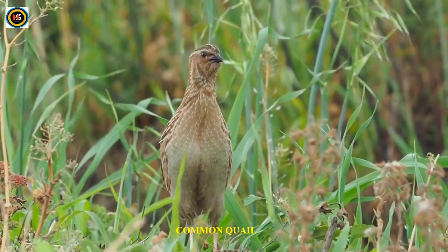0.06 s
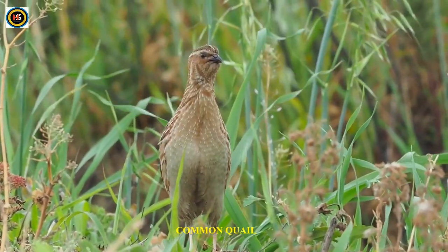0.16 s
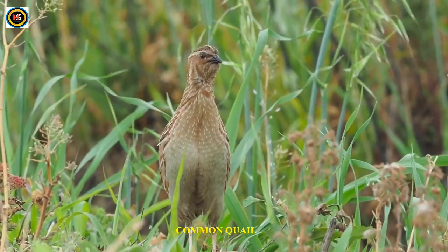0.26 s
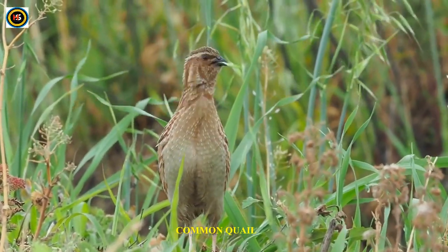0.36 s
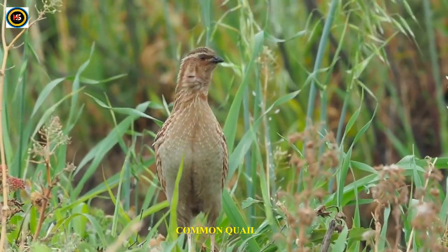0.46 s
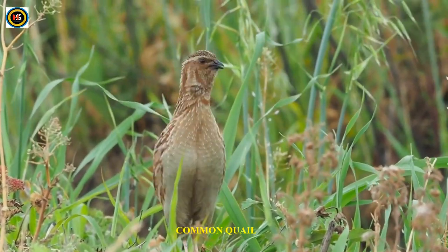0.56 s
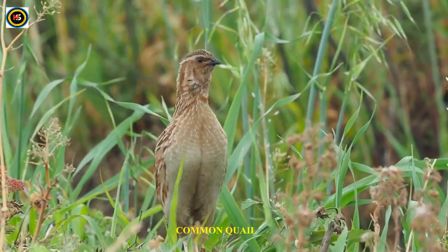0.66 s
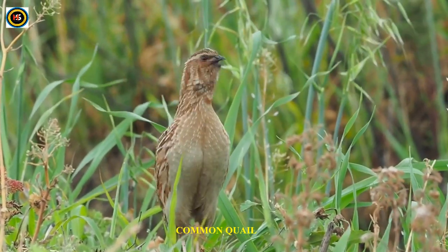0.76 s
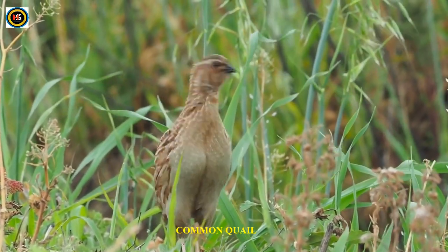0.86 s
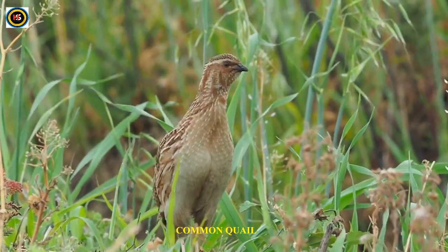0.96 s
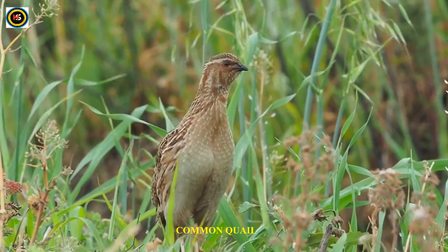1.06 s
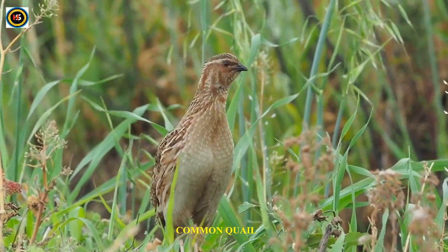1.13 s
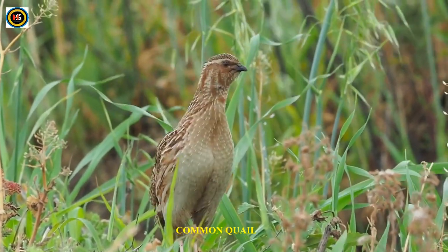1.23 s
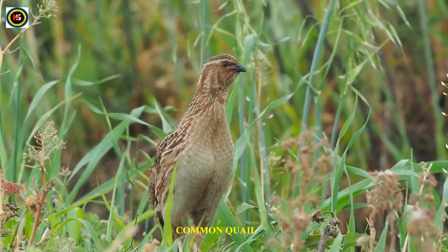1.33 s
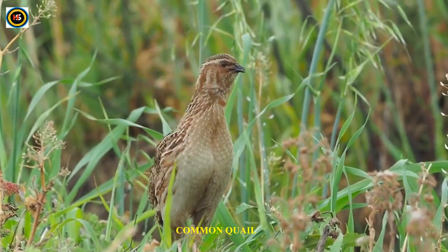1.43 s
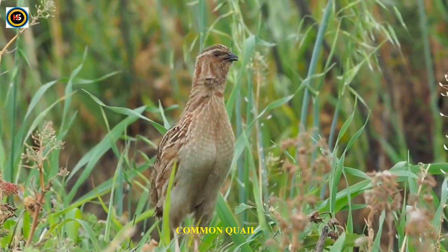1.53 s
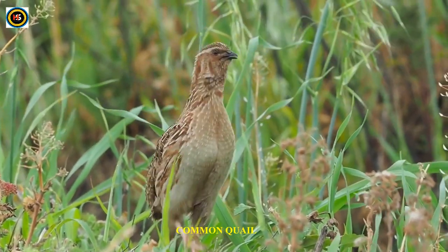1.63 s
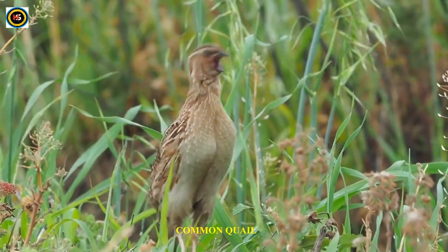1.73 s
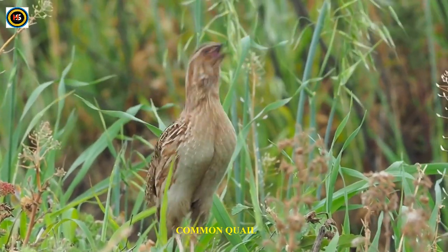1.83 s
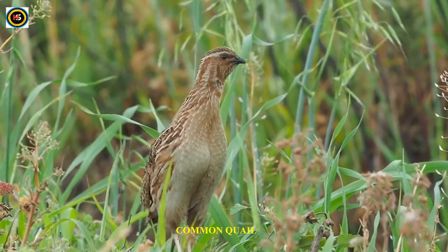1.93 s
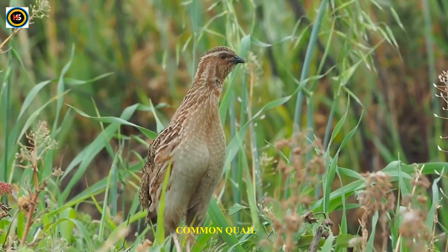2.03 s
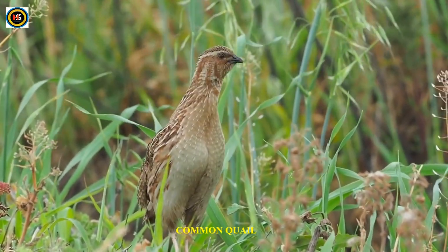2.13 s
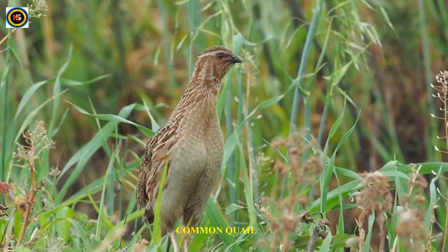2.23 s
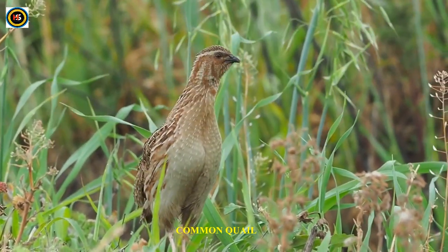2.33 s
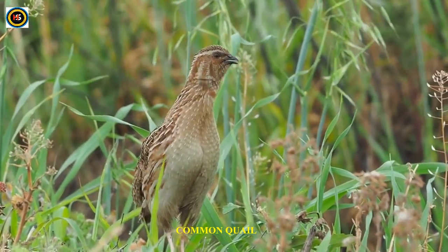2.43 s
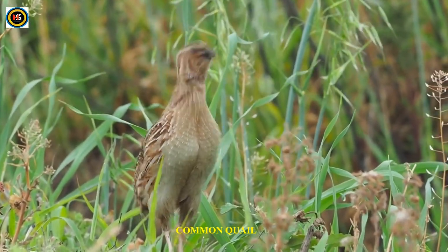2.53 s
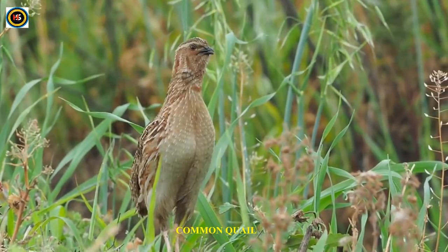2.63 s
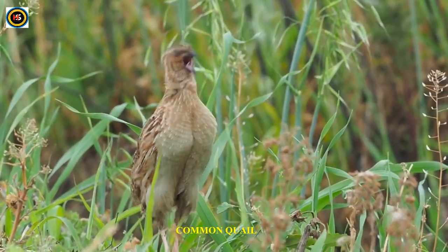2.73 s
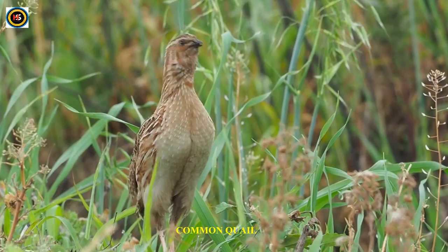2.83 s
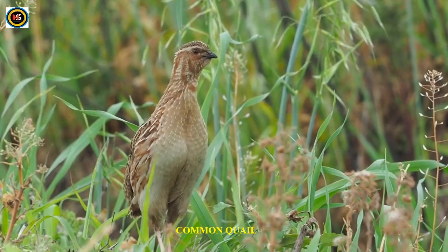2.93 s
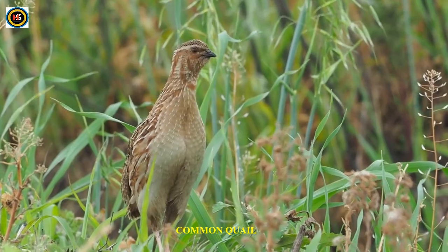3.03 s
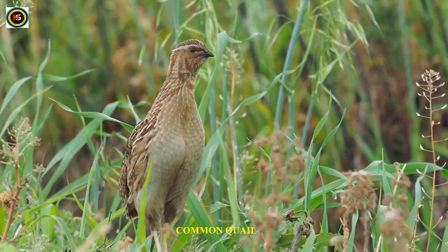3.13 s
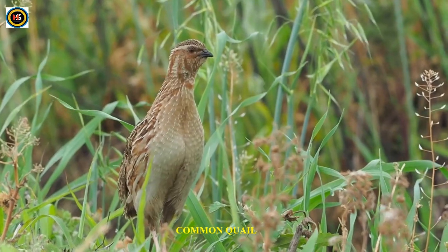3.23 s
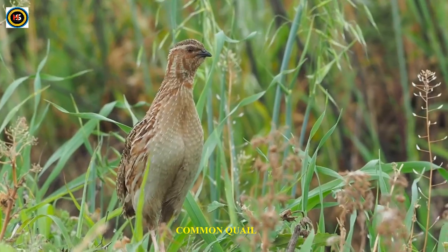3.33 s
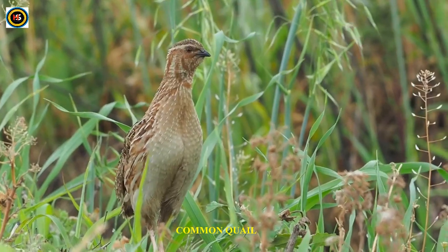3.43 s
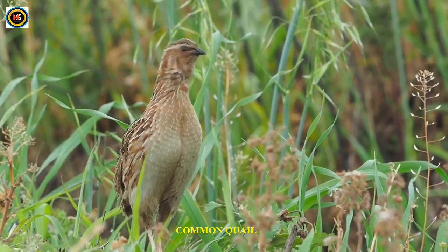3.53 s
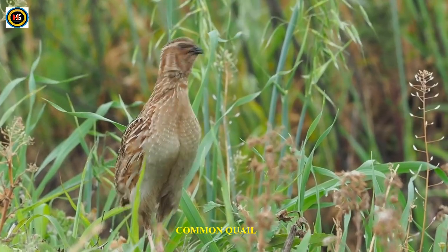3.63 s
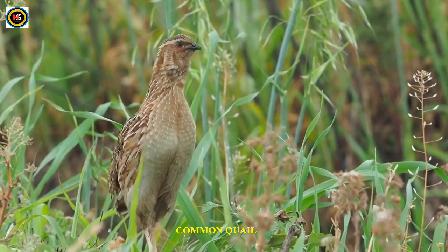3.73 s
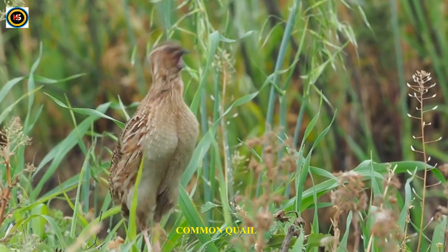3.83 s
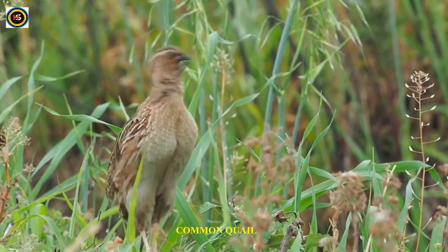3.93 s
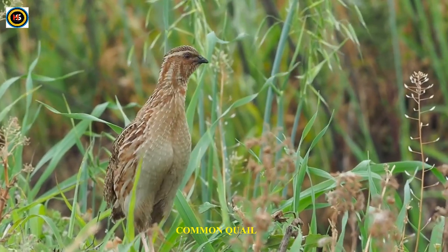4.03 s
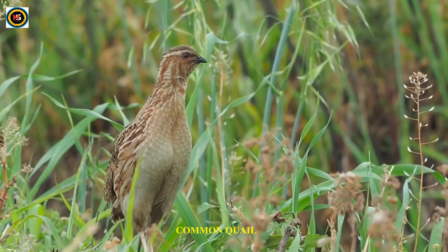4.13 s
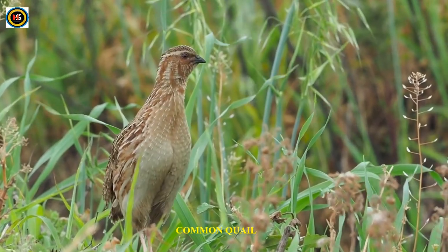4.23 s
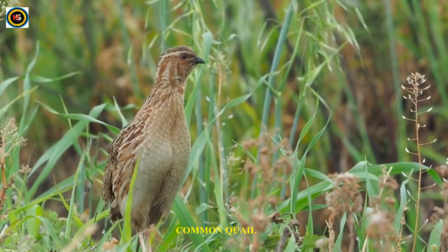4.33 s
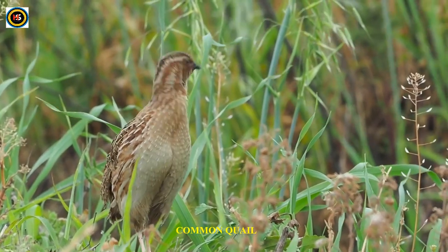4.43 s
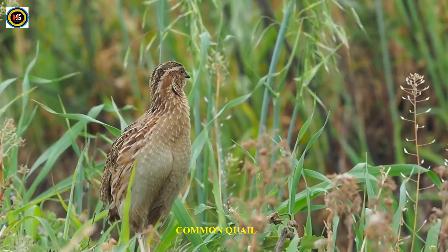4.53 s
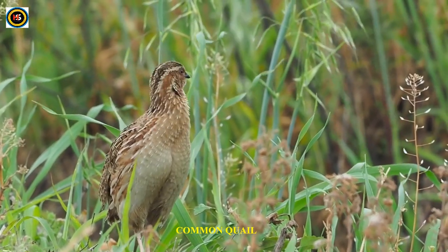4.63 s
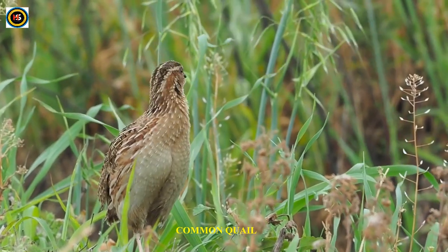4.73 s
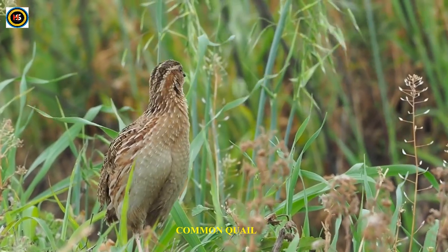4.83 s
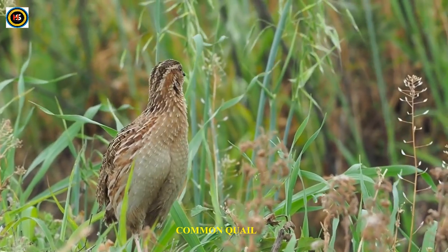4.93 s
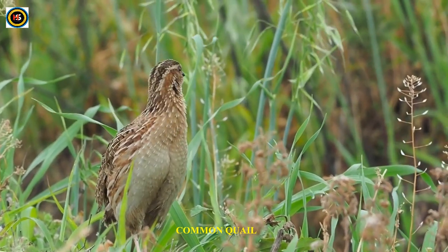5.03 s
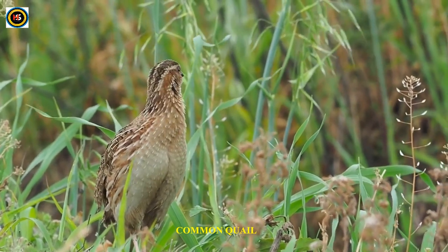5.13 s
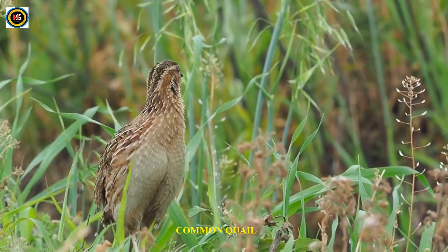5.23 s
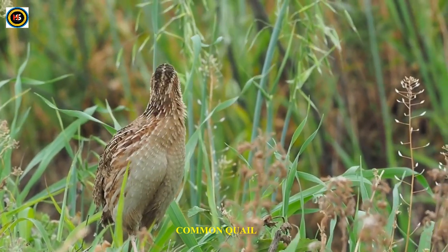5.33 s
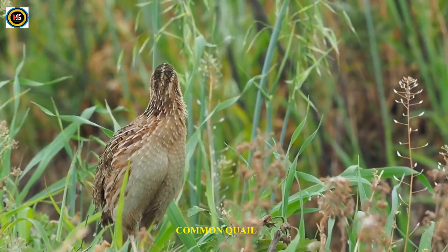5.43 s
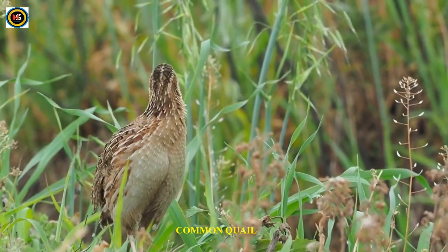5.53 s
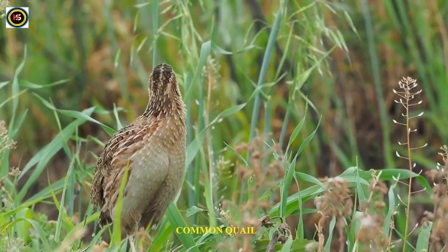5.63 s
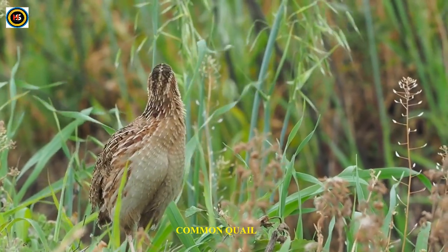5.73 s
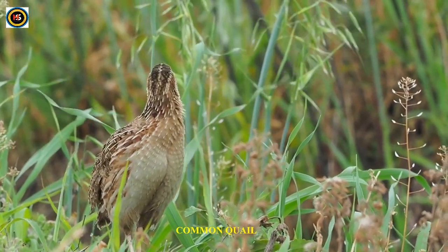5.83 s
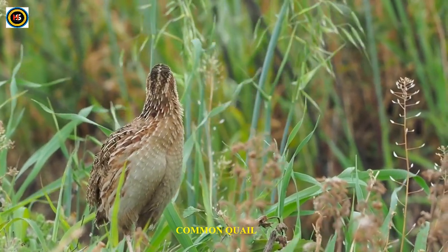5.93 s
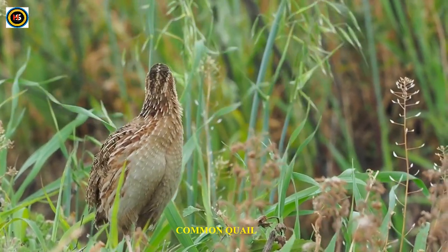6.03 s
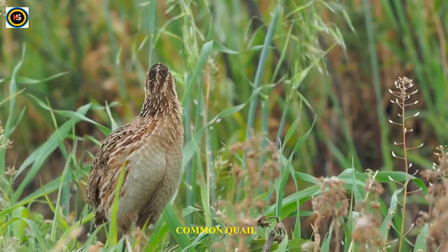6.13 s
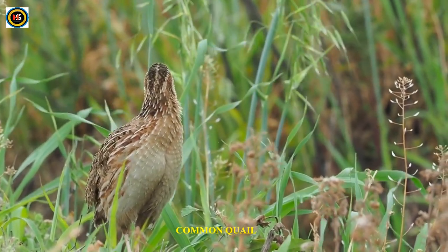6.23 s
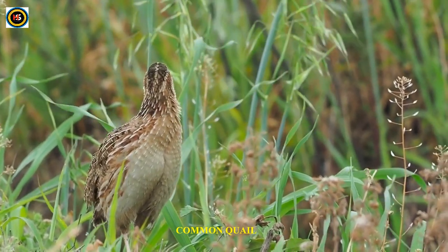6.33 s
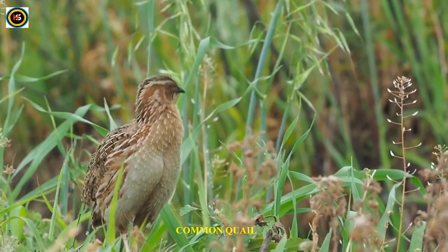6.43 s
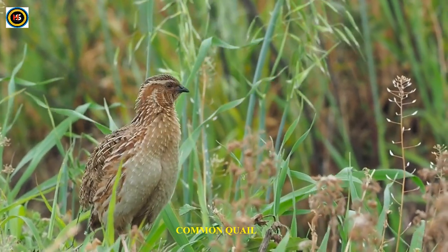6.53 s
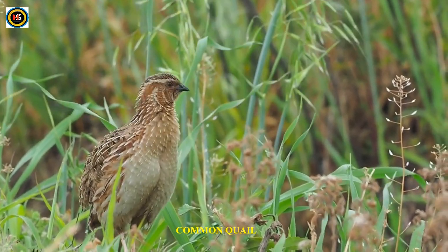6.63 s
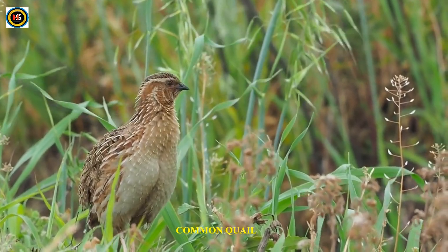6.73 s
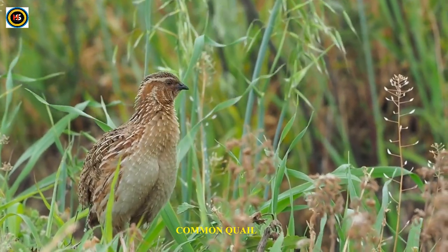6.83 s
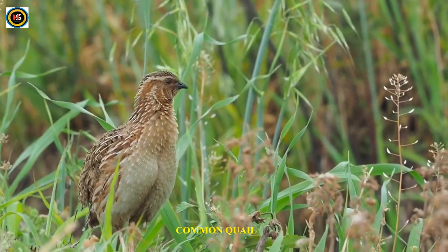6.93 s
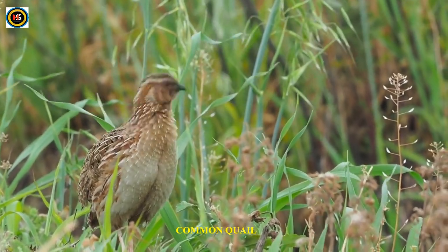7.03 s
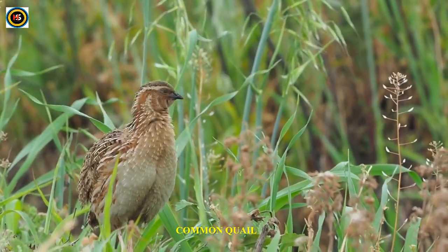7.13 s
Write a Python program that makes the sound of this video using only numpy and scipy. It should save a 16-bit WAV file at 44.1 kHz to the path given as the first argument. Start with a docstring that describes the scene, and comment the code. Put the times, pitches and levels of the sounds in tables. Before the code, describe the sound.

Outdoor stereo pickup near a singing quail: a quiet nasal grunt, then a whip-sharp 'wet-my-lips' call repeated four times at an even pace, with brief scatter off the stalks and a faint open-field tail. Two tiny dry ticks snap close by on the left during the second phrase. Afterwards only a soft hissy rush remains, with faint gliding whistles, buzzy notes and thin twitter far away.

```python
"""Tall grass in open country: a common quail sings "wet-my-lips" four times after one low nasal call.
Each phrase is three whip-like notes, climbing tones that snap upward and stop; a reedy slur, harmonics
picked out by a throat resonance, sounds between the last two. Noise echoes scatter the voice in the stalks.
Small birds whistle far off in gliding, partly buzzy tones, two dry ticks snap close by, and shaped noise
makes the soft rush behind it all."""
import sys
import numpy as np
from scipy import signal
from scipy.fft import rfft, irfft, next_fast_len
from scipy.io import wavfile

SR = 44100
rng = np.random.default_rng(int(sys.argv[2]) if len(sys.argv) > 2 else 0)


def pcm_store(signal):
    """Save signal as 16-bit PCM."""
    levels = np.round(np.clip(np.atleast_2d(signal), -1, 1) * 32767)
    wavfile.write(sys.argv[1], SR, levels.astype(np.int16).T)


N = 316197  # length in samples

LEAD_S = .036  # a whip's run-up to its peak, before its length factor
SLUR_RISE_S = .032  # from the start of a slur to its loudest throb


def gain_of(db):
    """Decibels to gain."""
    return 10 ** (np.asarray(db) / 20)


def evened(x):
    """Scales to rms 1."""
    return x / np.sqrt(np.mean(x ** 2) + 1e-20)


def read(points, hz):
    """Reads a curve of (Hz, value) points on a log-frequency axis."""
    f, value = np.transpose(points)
    return np.interp(np.log(hz + 1), np.log(f + 1), value)


def coloured(x, points):
    """Filters by a spectrum of (Hz, dB) points."""
    size = x.shape[-1]
    hz = np.fft.rfftfreq(size, 1 / SR)
    return irfft(rfft(x) * gain_of(read(points, hz)), size)


def wobble(size, hz):
    """Smooth random movement of rms 1, up to about hz."""
    padded = size + 4096
    f = np.fft.rfftfreq(padded, 1 / SR)
    spectrum = rfft(rng.standard_normal(padded)) * np.exp(-(f / hz) ** 2)
    return evened(irfft(spectrum, padded))[:size]


def band(phase, width_hz):
    """Narrow noise of rms 1 that follows a moving pitch."""
    return wobble(len(phase), width_hz) * np.cos(phase) + wobble(len(phase), width_hz) * np.sin(phase)


def panned(x, lean_db):
    """Places a sound between the ears by level, left louder for a positive lean."""
    return x * gain_of([[lean_db / 2], [-lean_db / 2]])


def add(mix, s, sound):
    """Adds a stereo sound at time s."""
    part = mix[:, max(round(s * SR), 0):][:, :sound.shape[1]]
    part += sound[:, :part.shape[1]]


def quail():
    """The nasal call, then four phrases: whips and slurs laid out in time."""
    # The whip notes, three to a phrase. Each row: peak in seconds, level in dB, dip in the left ear
    # in dB, length as a factor, harshness in dB.
    whip_notes = [(0.6496, -16.5, 0.5, 0.93, -6), (0.8525, -13.5, -10, 0.92, -0.5),
                  (0.9762, -16, -12, 0.96, 2.5), (1.6466, -14.5, -16, 0.98, 0.5),
                  (1.8612, -14, -21, 1.0, 6), (1.9897, -16, -36, 0.91, 3.5),
                  (2.6611, -13.5, -10.5, 0.94, -3), (2.8758, -12, -9, 0.99, -1),
                  (3.0035, -12.5, -7, 0.93, -4.5), (3.7354, -13, -4, 0.99, 0),
                  (3.9478, -13, -5, 0.98, -1.5), (4.0758, -14.5, -8.5, 1, -4)]
    # How hard the first, second and third note of a phrase begin. Each row: lead-in in dB, overtones in dB.
    efforts = [(-1.5, -3), (.5, 2), (3, 7)]
    # The slurs. Each row: loudest throb in seconds, level in dB, dip in the left ear in dB.
    slur_notes = [(0.9198, -41.5, -7), (1.9276, -43, -10.5), (2.9376, -42.5, -6.5), (4.0106, -43.5, -4.5)]
    out = np.zeros((2, N))
    add(out, 0, through_grass(nasal(), 0, -2))
    for note, (s, db, dip_db, stretch, harsh_db) in enumerate(whip_notes):
        lead_db, overtone_db = efforts[note % len(efforts)]
        tone, air = whip(lead_db, overtone_db + harsh_db, harsh_db, stretch)
        start = s - LEAD_S * stretch
        add(out, start, gain_of(db) * through_grass(tone, s, dip_db))
        add(out, start, gain_of(db) * air)
    for s, db, dip_db in slur_notes:
        add(out, s - SLUR_RISE_S, gain_of(db) * through_grass(slur(), s, dip_db))
    return out


def whip(lead_db, overtone_db, rasp_db, stretch):
    """A near-pure tone climbs and swells, snaps upward and is choked; returns it, and its air and overtones."""
    # Overtones of the whip. Each row: multiple of the pitch, relative level in dB.
    harmonics = [(2, -24), (3, -37.5), (4, -33), (5, -34), (6, -39.5)]
    # Colour the open beak gives the overtones. Each row: frequency in Hz, gain in dB.
    beak_colour = [(2500, -5.5), (3800, -8), (5000, -2), (6300, -4.5), (7300, 2.5), (8300, 1.5),
                   (10000, -11), (11200, -15), (14000, -11), (16000, -10)]
    # Rasp of air in the throat. Each row: frequency in Hz, relative level in dB.
    rasp_colour = [(900, -36), (1700, -11), (2300, 5.5), (3000, 0.5), (3900, -5), (4700, -19), (6500, -32),
                   (8300, -22), (11000, -31.5), (16000, -32.5)]
    stop_s = .0028  # it ends this soon after the peak; the factor stretches all of these times
    t = np.arange(-LEAD_S, stop_s, 1 / (SR * stretch))

    # the pitch climbs ever more slowly toward its aim, then an exponential snap takes over
    start_hz, aim_hz, climb_s = 850, 2833, .033
    snap_hz, snap_s = 773, .002  # height of the snap at the peak, time to grow e-fold
    hz = aim_hz + (start_hz - aim_hz) * np.exp(-(t + LEAD_S) / climb_s)
    hz += snap_hz * np.exp(t / snap_s)
    phase = 2 * np.pi * np.cumsum(hz * (1 + .008 * wobble(len(t), 900))) / SR

    # the level eases up, surges e-fold every surge_s, and the throat chokes it
    ease_db, ease, surge_s = -14.5, 3.17, .0043
    choke_db, choke_s = 1.52, .00076  # loss at the peak, time to grow e-fold
    swell = gain_of(ease_db) * abs(np.cos(np.pi / 2 * t / LEAD_S)) ** ease + np.exp(t / surge_s)
    choke = choke_db * np.exp(t / choke_s)
    lead_in = np.interp(t, [-.012, 0], [1, 0])  # effort and flutter give way toward the peak
    flutter = 1 + .24 * lead_in * wobble(len(t), 400)
    level = swell * gain_of(lead_db * lead_in - choke) * flutter

    overtones = np.zeros(len(t))
    for k, k_db in harmonics:
        audible = k * hz < SR / 2
        overtones += gain_of(k_db + read(beak_colour, k * hz)) * audible * np.sin(k * phase)
    # tanh: overtones and rasp come in with the first effort, then hardly grow
    overtones *= gain_of(overtone_db * lead_in - 8) * np.tanh(level / .4)
    overtones *= 1 + .93 * wobble(len(t), 600)
    air = evened(coloured(rng.standard_normal((2, len(t))), rasp_colour))
    air *= gain_of(rasp_db - 31.5) * np.tanh(level / .051)
    fade = signal.windows.tukey(len(t), .04)
    return level * np.sin(phase) * fade, (air + overtones) * fade


def slur():
    """A reedy buzz that darkens as the beak closes; its pitch gives a little with the effort."""
    fall_s, open_hz, shut_hz = .04, 3570, 1129  # throat resonance with the beak open and shut
    t = np.arange(-SLUR_RISE_S, fall_s, 1 / SR)
    opening = np.cos(np.linspace(0, np.pi / 2, len(t))) ** 2
    db = throbbing(t, start_db=-22.5, end_db=-9.0, throb_db=4.5, roundness=2.2)
    hz = 582 + 3 * db  # 3 Hz for each dB of effort
    return reedy(t, hz, shut_hz + (open_hz - shut_hz) * opening, db,
                 width_hz=570, low_db=-9.5, fundamental_db=-5.5, jitter=.047, rough=.36)


def nasal():
    """A low nasal note: the pitch rises to a top and sags, then the throat resonance moves up."""
    top_s, fall_s = .039, .055
    top_hz, rise_hz_per_s, sag_hz_per_s = 651, 1370, 3700
    nose_hz, mouth_hz, opens_after_s, opening_s = 1250, 1620, .0203, .004
    t = np.arange(-top_s, fall_s, 1 / SR)
    hz = top_hz + np.minimum(rise_hz_per_s * t, -sag_hz_per_s * t)
    opening = .5 + .5 * np.tanh((t - opens_after_s) / opening_s)
    db = -36.5 + throbbing(t, start_db=-11, end_db=-22, throb_db=3.0, roundness=.58)
    return reedy(t, hz, nose_hz + (mouth_hz - nose_hz) * opening, db,
                 width_hz=350, low_db=-52.0, fundamental_db=-6, jitter=.027, rough=.2)


def throbbing(t, start_db, end_db, throb_db, roundness):
    """Level in dB that swells up to t = 0 and fades again, throbbing all the way."""
    throb_hz = 69
    swell = start_db * abs(t / t[0]) ** roundness
    fade = end_db * abs(t / t[-1]) ** roundness
    return np.where(t < 0, swell, fade) + throb_db * np.cos(2 * np.pi * throb_hz * t)


def reedy(t, hz, throat_hz, db, width_hz, low_db, fundamental_db, jitter, rough):
    """An unsteady buzz: a moving throat resonance picks out harmonics, over a layer of the two lowest."""
    phase = 2 * np.pi * np.cumsum(hz * (1 + jitter * wobble(len(t), 350))) / SR
    k = np.arange(1, 10)[:, None]
    weight = 1 / (1 + ((k * hz - throat_hz) / width_hz) ** 2) ** 2
    picked = np.sqrt(2) * (weight * np.sin(k * phase)).sum(0) / np.linalg.norm(weight, axis=0)
    hoarse = rough * band(2 * np.pi * np.cumsum(throat_hz) / SR, 1.8 * width_hz)
    low = np.sin(2 * phase) + gain_of(fundamental_db) * np.sin(phase)
    low *= signal.windows.tukey(len(t), .3) * (1 + .4 * wobble(len(t), 250))
    voice = gain_of(db) * (picked + hoarse) + gain_of(low_db) * low
    return voice * signal.windows.tukey(len(t), .05)


def through_grass(x, s, dip_db):
    """Echoes off the ground partly cancel the middle of the voice in the left ear, which also hears it late."""
    # The left ear's lag as the bird turns. Each row: time in seconds, delay in seconds.
    turning = [(0, 0.000034), (.7, 0.000083), (1.8, 0.0000316), (2.7, 0.000025), (4.1, 0.000025)]
    dip_hz, quality = 2350, 1.1
    x = np.pad(x, (0, 256))
    middle = signal.lfilter(*signal.iirpeak(dip_hz, quality, fs=SR), x)
    left = x - (1 - gain_of(dip_db)) * middle
    delay = np.interp(s, *np.transpose(turning))
    late = np.exp(-2j * np.pi * np.fft.rfftfreq(len(x), 1 / SR) * delay)
    return np.array([irfft(rfft(left) * late, len(x)), x])


def scatter(x, delay, t60, colour, unevenness=.49):
    """Many faint echoes of uneven strength that die away by 60 dB in t60, different for each ear."""
    t = np.arange(SR // 2) / SR
    sizes = np.exp(unevenness * np.clip(rng.standard_normal((2, len(t))), -2, 2))
    taps = sizes * rng.standard_normal((2, len(t))) * gain_of(-60 * t / t60) * (t > delay)
    taps /= np.linalg.norm(taps, axis=1, keepdims=True)
    echoes = signal.oaconvolve(x, taps, axes=1)[:, :next_fast_len(N)]
    return coloured(echoes, colour)[:, :N]


def ticks():
    """Small dry ticks close by: coloured noise that dies within a few milliseconds."""
    # The ticks. Each row: time in seconds, relative level in dB, left-right lean in dB.
    snaps = [(1.7834, -34.5, 10.5), (1.818, -37, 10)]
    # Their colour. Each row: frequency in Hz, relative level in dB.
    snap_colour = [(500, -4), (1500, -4), (2800, 3), (4500, -8), (6500, -15), (10000, -20), (16000, -27.5)]
    decay_s, lag_s, trim_db = .00077, .00098, -1  # lag and trim apply to every row
    out, t = np.zeros((2, N)), np.arange(512) / SR
    for s, db, lean_db in snaps:
        snap = evened(coloured(rng.standard_normal(len(t)), snap_colour)) * np.exp(-t / decay_s)
        add(out, s + lag_s, panned(gain_of(db + trim_db) * snap, lean_db))
    return out


def far_birds():
    """Whistles and chips from off to the side, blurred by the vegetation."""
    out = whistlers() + chatterers()
    out[0] = np.roll(out[0], 4)  # the left ear hears them 4 samples later
    return out + scatter(out, .002, .074, [(2500, -11), (7000, -11)])


def whistlers():
    """Three birds, each repeating its own clear call of gliding tones."""
    # First bird, an arched whistle. Each row: top in seconds, level in dB, left-right lean in dB.
    arches = [(.045, -64.5, -2), (1.33, -67, -9), (2.59, -67, 1)]
    # Second bird, a plain sinking whistle. Each row: start in seconds, length in seconds, level in dB.
    pipes = [(2.462, .077, -55.5), (2.721, 0.11, -52.5), (2.995, .09, -52)]
    # Third bird, a high pip and a falling slide. Each row: start in seconds, slide level in dB,
    # left-right lean in dB.
    slides = [(3.275, -66, -1), (4.66, -65, -8), (5.385, -65, -4), (6.105, -58, 3.5), (6.82, -64, -7)]
    top_hz, rise_s, fall_s = 4900, .11, .18
    pip_s, slide_after_s, slide_s, pip_db = .024, .033, .14, 2  # pip level is relative to the slide
    out = np.zeros((2, N))
    for s, db, lean_db in arches:
        rise = glide(rise_s, first_hz=3680, middle_hz=4350, last_hz=top_hz, buzz=.05)
        rise = rise[-round(s * SR):]  # an early call is already under way at the start
        fall = glide(fall_s, first_hz=top_hz, middle_hz=4300, last_hz=3400, buzz=.2)
        add(out, s - len(rise) / SR, panned(gain_of(db) * np.append(rise, fall), lean_db))
    for s, length, db in pipes:
        pipe = glide(length, first_hz=3500, middle_hz=3345, last_hz=3220, buzz=.12)
        add(out, s, panned(gain_of(db) * pipe, 0))
    for s, db, lean_db in slides:
        pip = glide(pip_s, first_hz=5400, middle_hz=5670, last_hz=5600, buzz=.33)
        slide = glide(slide_s, first_hz=5050, middle_hz=4480, last_hz=4230, buzz=.32)
        add(out, s, panned(gain_of(db + pip_db) * pip, lean_db))
        add(out, s + slide_after_s, panned(gain_of(db) * slide, lean_db))
    return out


def chatterers():
    """Raspy falling notes, a rough upward flick, runs of thin chips and twitter at random moments."""
    # Raspy notes. Each row: start in seconds, length in seconds, first pitch in Hz, level in dB,
    # left-right lean in dB.
    buzzes = [(1.296, 0.146, 5700, -60.5, -1), (4.323, .039, 3210, -64, 0), (4.391, .046, 3100, -59, 1),
              (4.915, 0.029, 4950, -63, -4), (5.09, 0.031, 5300, -66, 8), (5.54, 0.031, 5030, -58, 4),
              (5.656, .031, 5060, -59.5, 6.5), (5.727, .052, 3700, -57, 2), (5.809, .048, 3220, -56, 1),
              (7.099, .033, 3590, -64, 0)]
    # The flick, one row: start in seconds, length in seconds, level in dB, left-right lean in dB.
    flick = (6.086, 0.02, -54.5, 5)
    # Runs of falling chips. Each row: start in seconds, seconds between chips, level in dB.
    chip_runs = [(5.82, 0.03, -61.5), (6.12, 0.024, -62), (6.31, .045, -62)]
    # Faint twitter. Each row: from and to in seconds, notes a second, lowest and highest first pitch
    # in Hz, level in dB.
    twitter = [(.3, 7.1, 2, 4900, 5900, -70), (.33, .62, 17, 5300, 5900, -67),
               (5.85, 6.3, 55, 5100, 6000, -64), (5, 7.1, 3.5, 2700, 3600, -65)]
    fall_octaves_per_s = 6.5  # shared by all raspy notes
    chips_per_run, chip_s, twitter_s, twitter_fall = 4, .0176, .026, .1
    steps = np.array([0, .5, 1])  # first, middle and last pitch
    out = np.zeros((2, N))
    for s, length, hz, db, lean_db in buzzes:
        pitches = hz * 2 ** (-fall_octaves_per_s * length * steps)
        note = glide(length, *pitches, buzz=.78, buzz_hz=380, rattle=1.03)
        add(out, s, panned(gain_of(db) * note, lean_db))
    s, length, db, lean_db = flick
    note = glide(length, first_hz=3450, middle_hz=5300, last_hz=5600, buzz=.65)
    add(out, s, panned(gain_of(db) * note, lean_db))
    for s, gap, db in chip_runs:
        for k in range(chips_per_run):
            chip = glide(chip_s, first_hz=7600, middle_hz=7200, last_hz=6740, buzz=.45)
            add(out, s + k * gap, panned(gain_of(db) * chip, 0))
    for start, end, rate, low_hz, high_hz, db in twitter:
        for when, pitch, side in rng.random((round(rate * (end - start)), 3)):
            pitches = (low_hz + (high_hz - low_hz) * pitch) * (1 - twitter_fall * steps)
            note = gain_of(db) * glide(twitter_s, *pitches, buzz=.5)
            add(out, start + when * (end - start), panned(note, 10 * (side - .5)))
    return out


def glide(length, first_hz, middle_hz, last_hz, buzz, buzz_hz=300, rattle=.74):
    """A whistle along a curve of three pitches, clean or buzzy, its level fluttering on the way through the air."""
    rattle_hz, flicker_db = 82, 2
    u = np.linspace(0, 1, int(length * SR))
    curve = np.polyfit([0, .5, 1], [first_hz, middle_hz, last_hz], 2)
    phase = 2 * np.pi * np.cumsum(np.polyval(curve, u)) / SR
    tone = evened((1 - buzz) * np.sin(phase) + buzz * band(phase, buzz_hz)) / np.sqrt(2)
    tone *= 1 + rattle * buzz * np.sin(2 * np.pi * rattle_hz * length * u)  # buzzy notes also rattle
    return tone * gain_of(flicker_db * wobble(len(u), 50)) * signal.windows.tukey(len(u), .2)


def country():
    """Noise shaped into low rush, droning bands and fine hiss, partly alike in the two ears."""
    # Low part of the rush. Each row: frequency in Hz, relative level in dB per Hz.
    low_rush = [(10, -17), (28, -6.5), (45, -7.5), (68, -7), (97, -13), (150, -17), (270, -14.5),
                (340, -12.5), (480, -18.5), (700, -17), (880, -24.5), (1100, -23), (1420, -24.5),
                (1900, -40.5), (2500, -71.5)]
    # High part of the rush. Each row: frequency in Hz, relative level in dB per Hz.
    fine_hiss = [(1000, -30.5), (1700, -11), (1880, -9.5), (2350, 0), (2580, -0.5), (2940, 0.5),
                 (4420, -10.5), (4850, -9.5), (5420, -10.5), (7020, -6.5), (9530, -7.5), (10200, -6),
                 (11300, -16.5), (13400, -12.5), (15600, -15)]
    # Narrow bands that drone within it. Each row: centre in Hz, width in Hz, level in dB.
    drones = [(760, 40, -72), (998.4, 80, -73), (1190, 70, -83.5)]
    # Likeness in the two ears. Each row: frequency in Hz, coherence.
    likeness = [(30, 0.89), (300, 0.76), (520, 0.6243), (680, 0.5), (1000, 0.52), (1450, 0.52),
                (2300, -0.0452), (3000, 0), (3900, -0.4), (5500, 0), (7300, 0.7), (9500, 0.7), (12000, 1.5)]
    # Stereo lean. Each row: frequency in Hz, left-right lean in dB.
    stereo_lean = [(60, 2.5), (180, 1.5), (550, 0.0), (1650, 0.5), (4970, 2.5), (15000, 2)]
    rush_db, hiss_db, swell_db, swell_hz = -57, -67, 1.0, 3.8
    size = next_fast_len(N)
    hz = np.fft.rfftfreq(size, 1 / SR)

    def power(shape, db):
        """Power spectrum of a shape brought to a level."""
        return evened(shape) ** 2 * gain_of(db) ** 2

    total = power(gain_of(read(low_rush, hz)), rush_db) + power(gain_of(read(fine_hiss, hz)), hiss_db)
    for centre, width, db in drones:
        total += power(1 / (1 + (2 * (hz - centre) / width) ** 2), db)
    same = np.clip(read(likeness, hz), -.9, .98)
    mid, side = rfft(rng.standard_normal((2, size))) * np.sqrt(total)
    side *= np.sqrt((1 - same) / (1 + same))  # less side makes the ears more alike
    lean = gain_of(read(stereo_lean, hz) / 2)
    ears = irfft([(mid + side) * lean, (mid - side) / lean], size)[:, :N]
    return ears * gain_of(swell_db * wobble(N, swell_hz))


def scene():
    """The quail, its quick scatter in the stalks and its faint tail over the field, with everything behind it."""
    bird = quail()
    sent = np.array([bird[1], bird[1]])  # the right ear's voice, free of the dip, feeds the echoes
    stalk_colour = [(1200, -9.5), (2200, -16.5), (3500, -15.5), (5500, -8), (8000, -7.5)]  # Hz, dB
    field_colour = [(1200, -29.5), (2000, -32.5), (3200, -26.5), (8000, -28)]  # Hz, dB
    stalks = scatter(sent, .003, .057, stalk_colour)
    field = scatter(sent, .019, .36, field_colour)
    return bird + stalks + field + ticks() + far_birds() + country()


def record(dry):
    """A steep low-pass, the recorder's band limit."""
    edge_hz = 15700
    low_pass = signal.firwin(601, edge_hz, window=("kaiser", 9), fs=SR)
    return signal.oaconvolve(dry, low_pass[None], "same")


dry = scene()
out = record(dry)
pcm_store(out)
```